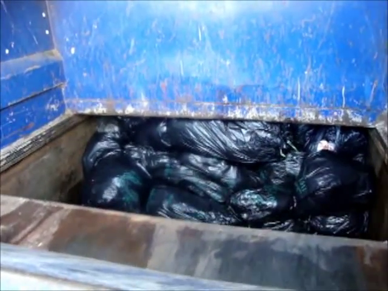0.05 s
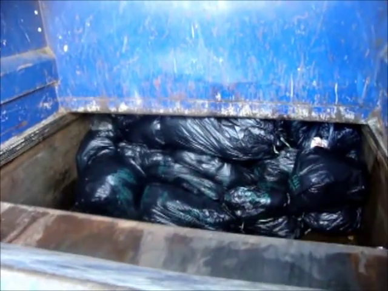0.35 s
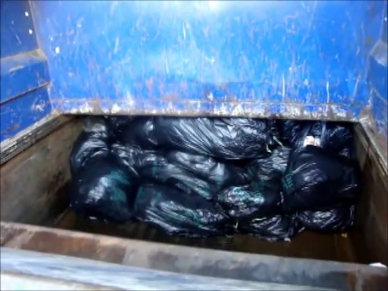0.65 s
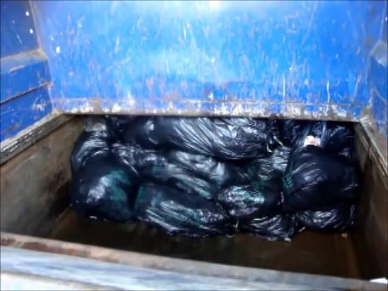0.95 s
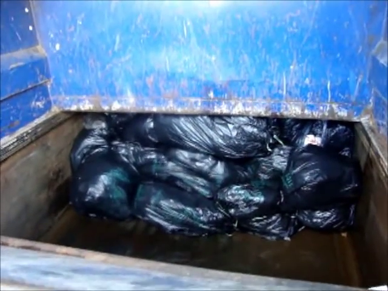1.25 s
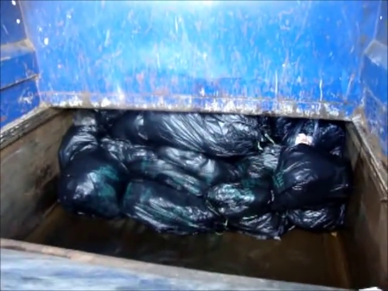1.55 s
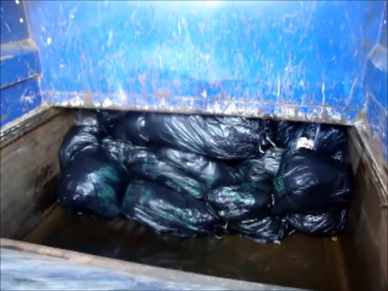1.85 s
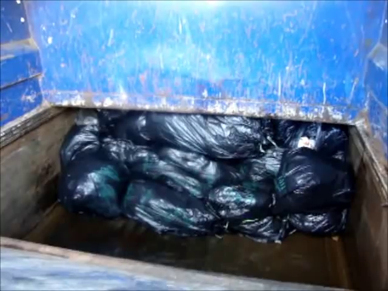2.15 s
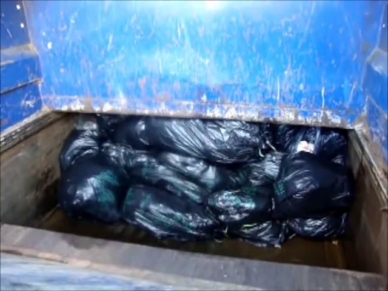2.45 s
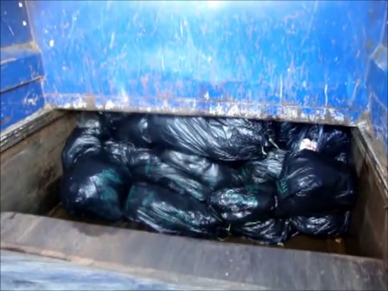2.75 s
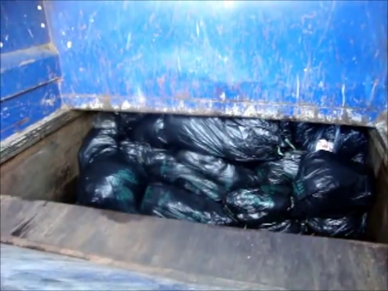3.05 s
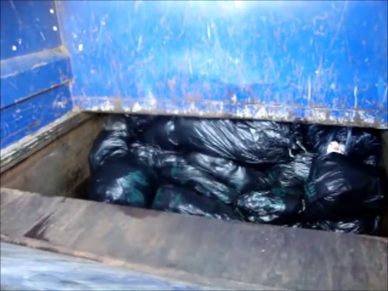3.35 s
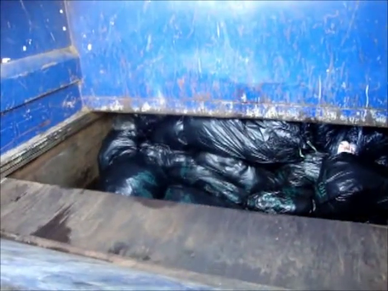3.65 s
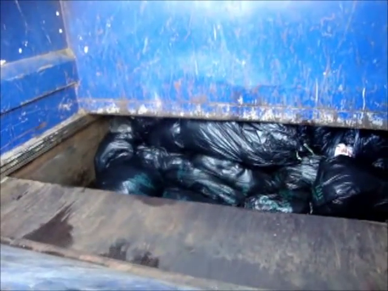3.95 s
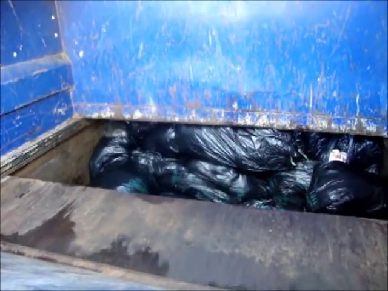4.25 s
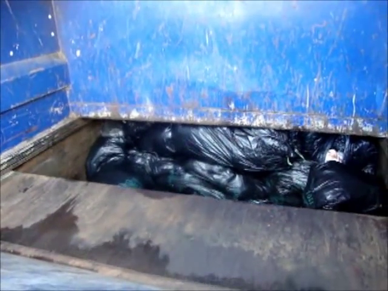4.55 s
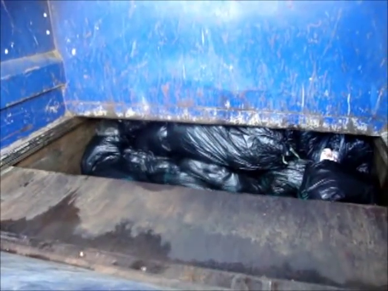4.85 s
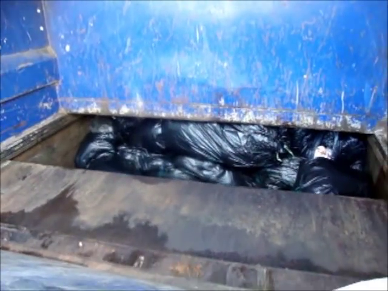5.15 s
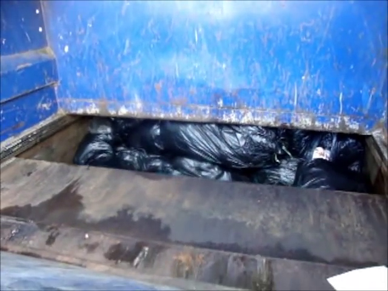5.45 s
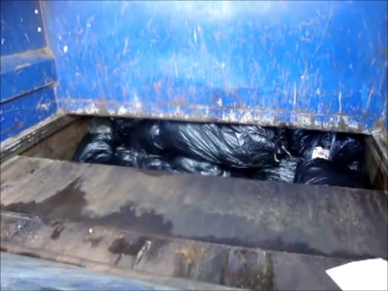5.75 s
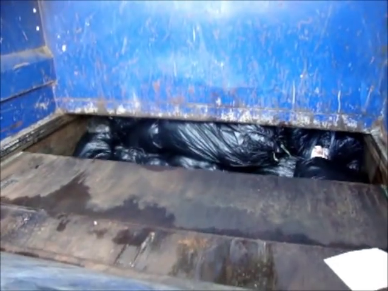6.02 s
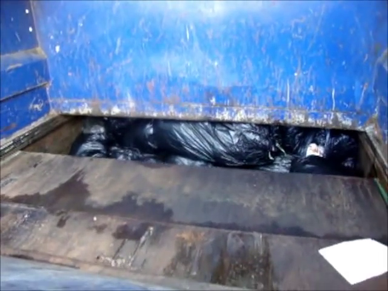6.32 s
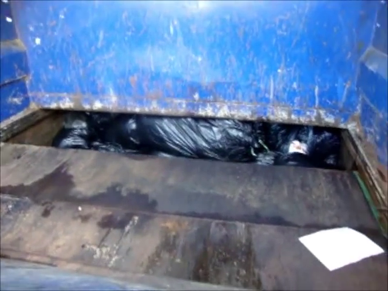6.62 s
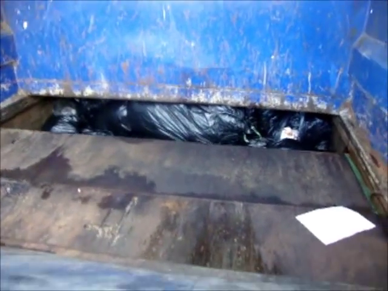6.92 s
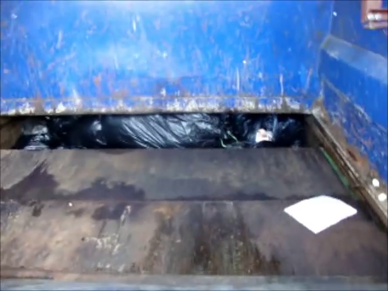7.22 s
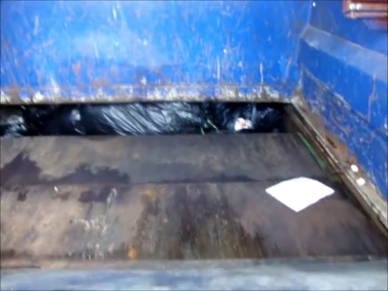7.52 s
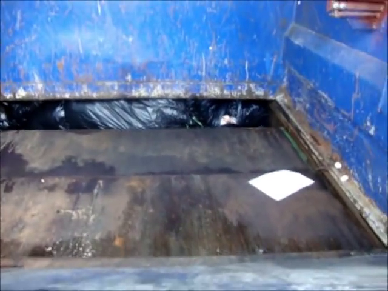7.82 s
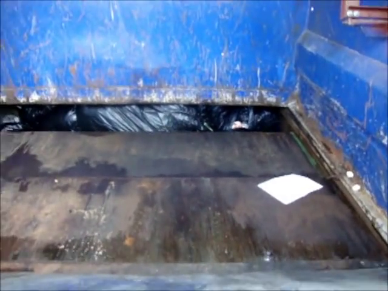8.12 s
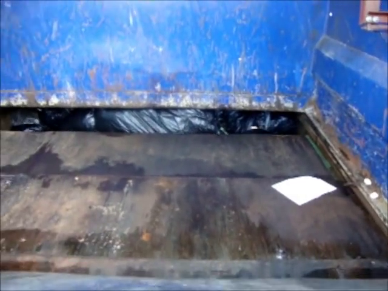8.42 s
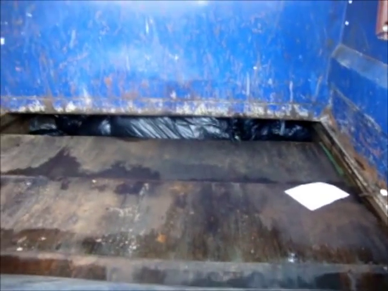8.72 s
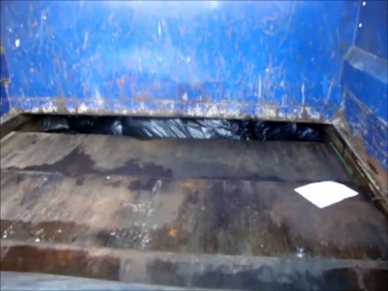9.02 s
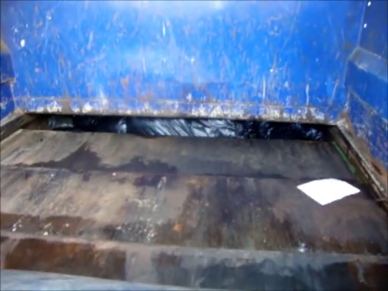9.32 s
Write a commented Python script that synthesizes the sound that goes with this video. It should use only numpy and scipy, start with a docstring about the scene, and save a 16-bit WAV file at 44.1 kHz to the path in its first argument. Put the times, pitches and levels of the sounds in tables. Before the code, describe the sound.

A trash compactor's hydraulic pump whines throughout, heard from just above the steel hopper, with a fast throb and a steady rush and hiss of oil. A metal knock comes at about 0.2 seconds, with lighter ones near 0.9 and 1.2. From about 1.2 to 1.9 seconds the whine drops slightly in pitch and strains, wavering, with a thin high hiss. A quick cluster of heavy, ringing steel clunks follows around 2 seconds, and the pitch recovers. A second loud cluster hits at about 4.4 to 4.6 seconds; the overall sound dips briefly after the heavy blows. Lighter cracks follow near 5 and 5.4 seconds. The whine then grows shriller and more rattly, its tones swelling and fading over a faint low rumble, and the throb returns around 7 seconds. A soft thump comes at 8.3 seconds and a faint, thin metal squeak at 9.

```python
"""A throbbing whine over rushing oil: a trash compactor, microphone above its steel hopper.
A motor turns a twelve-tooth hydraulic gear pump. The ram draws back, stalls the pump against
its end stop while the relief valve sings, reverses with a clunk and pushes into the bags. The steel
clunks again, the load cracks, and the whine's partials swell and fade as the cavity changes shape.
The camera's gain ducks after the heavy clunks and creeps back."""
import sys
import numpy as np
from scipy.fft import rfft, irfft, next_fast_len
from scipy.io import wavfile
from scipy.ndimage import uniform_filter1d, map_coordinates

SR = 44100
rng = np.random.default_rng(int(sys.argv[2]) if len(sys.argv) > 2 else 0)


def digitize_waveform(pressure):
    """Quantize a signal to 16-bit integers and store it at the path in sys.argv[1].

    Rows of a 2-D input are taken as channels; values are limited to [-1, 1].
    """
    field = np.atleast_2d(pressure).T
    bounded = np.clip(field, -1, 1)
    quanta = np.round(bounded * 32767).astype(np.int16)
    wavfile.write(sys.argv[1], SR, quanta)


N = 418068
TEETH = 12
TOP_HZ = 10150  # upper band limit

# faint low rumble under the whine: t/s, level/dB
LOW_RUMBLE = [(1.5, -67.5), (3.8, -48.5), (6.6, -62.5), (7.5, -52.5)]
# oil in the valves and pipes: f/Hz, relative spectral level/dB
OIL_SPECTRUM = [(50, -33), (125, -14), (170, -4.5), (250, -8), (420, 0.5), (700, 3.5), (1000, 0.5),
                (1400, -3.5), (2000, -9.5), (2700, -10), (3400, -16), (4300, -16), (6000, -21.5),
                (9800, -30.5)]
# squeak of the sliding ram: t/s, f/Hz, level/dB
RAM_SQUEAK = [(8.95, 5000, -70), (9.0, 5000, -35), (9.06, 5100, -58), (9.078, 5750, -33),
              (9.092, 5240, -43), (9.15, 5400, -37), (9.19, 5540, -70)]
# rattle of the turning shaft: f/Hz, relative spectral level/dB
RATTLE_SPECTRUM = [(50, -37), (100, -22.5), (170, 4.5), (400, 1), (800, 6), (1400, 2), (2700, -5.5),
                   (3500, -19.5), (4300, -14.5), (6000, -29), (8000, -19), (10000, -30)]
# resonances of hopper and ram: f/Hz, width/Hz, relative level/dB
STEEL_MODES = [(190, 80, -12), (380, 98, 5.5), (700, 390, 4), (905, 74, 1), (1190, 110, 3.5),
               (1480, 240, -3), (1930, 490, -7), (2440, 690, -3.5), (4070, 890, -13.5), (4450, 530, -24)]
# blows on the steel, levels relative: t/s, boom/dB, clang/dB, crack/dB, strongest mode f/Hz
STEEL_BLOWS = [(.190, -20, -11, -14.5, 1422), (.224, -28, -17.5, -28, 1405), (0.855, -39, -16, -18, 4470),
               (1.198, -34, -18, -25.5, 2880), (1.891, -15, -8.5, -18.5, 1190),
               (1.925, -21, -10.5, -16.5, 3830), (1.956, -13, -12, -36, 810),
               (1.991, -6.5, -14.5, -34, 427), (2.055, -11.5, -17, -24.5, 527),
               (2.076, -18, -15, -41, 2390), (2.104, -16, -11.5, -14.5, 1930),
               (2.145, -16, -16, -17.5, 1480), (4.397, -10.5, -8.5, -22, 1075),
               (4.423, -7, -10, -16.5, 1152), (4.529, -14, -5, -16, 945), (4.555, -12.5, -15, -28, 684),
               (4.586, -11, -30, -44, 625), (4.968, -36, -21.5, -23, 1720), (5.343, -31, -21, -27.5, 1890),
               (5.429, -35, -21, -30, 1707), (8.33, -31.5, -50, -46, 146)]
# the pump's tooth rate, sagging under full pressure: t/s, f/Hz
TOOTH_RATE = [(0, 298), (.25, 298), (1.02, 296.3), (1.27, 286.2), (1.875, 286.2), (1.93, 296.6),
              (2.4, 298.1), (9.48, 298.05)]
# groups of pump tones: f/shaft rate, relative level/dB
STRAIN_LINES = [(72, -5), (96, -7), (108, -2), (120, -12.5), (192, -27), (204, -16.5)]  # grow at full pressure
SHRILL_LINES = [(95, 5.5), (96, 2.5)]  # a pair that beats once a turn
SIDEBAND_LINES = [(9, -18.5), (11, -10), (13, -13.5), (14, -10.5), (22, -29), (25, -19), (32, -8),
                  (34, -15), (35, -3), (37, -8.5), (38, -9.5), (46, -7), (47, -7.5), (49, -9)]  # from uneven teeth, beside the tooth harmonics
OVERTONE_LINES = [(60, -4), (72, -4.5), (84, -8), (108, -12), (120, -13.5), (132, -18.5), (144, -17.5),
                  (168, -21), (204, -21), (264, -30.5), (301, -21.5), (325, -38.5)]  # high in the whine
# all sidebands together: t/s, level/dB
SIDEBAND_SWELL = [(0.0, -34.5), (2.8, -37), (2.96, -33.5), (4.92, -30.5), (5.76, -24.5), (6.76, -23.5),
                  (7.44, -23.5), (9.48, -35.5)]
# pump layers by name: level/dB pushing freely, then gain/dB drawing back, stalled, shoving, squeezing
WORK_LEVELS = {"throb": (-42, 16.5, 11.5, -15, 21.5), "shrill": (-39.5, 3, -8, 12, 1),
               "overtones": (-34, 3.5, 2, -4, 9.5), "rush": (-26.5, 3, -2, -4.5, 2.5),
               "hiss": (-31.5, 3, 2.5, 0, 3)}
# tooth harmonics 1-4 above the hopper while the ram travels: t/s, level/dB
HARMONIC_1 = [(0.0, -21.5), (0.36, -27), (2.32, -22), (3.04, -12), (4.28, -11.5), (4.84, -23), (5.6, -19.5),
              (6.162, -27), (6.36, -20.5), (6.8, -33), (6.96, -20.6), (7.56, -15), (8.04, -15.5),
              (8.44, -12), (9.48, -12.5)]
HARMONIC_2 = [(0.0, -16), (0.28, -20.5), (0.56, -15.5), (2.76, -27.5), (2.96, -19.5), (4.04, -27.5),
              (4.16, -50), (5.12, -29), (5.48, -21.2), (6.52, -16), (7.64, -27), (7.84, -32.5), (8.36, -30),
              (8.64, -15.5), (9.48, -17.8)]
HARMONIC_3 = [(0.0, -28), (0.48, -27), (0.76, -13.5), (0.96, -23), (2.52, -34), (2.839, -21), (4.72, -31),
              (4.879, -22.5), (5.08, -26.5), (7.04, -26), (7.24, -19), (7.68, -16.5), (8.0, -21.5),
              (9.48, -24)]
HARMONIC_4 = [(0.0, -27.5), (0.64, -27.5), (2.48, -21), (3.16, -22), (3.44, -31.5), (4.08, -24.5),
              (4.36, -36), (4.88, -23.5), (6.08, -16.5), (7.28, -17.5), (7.64, -27.5), (7.92, -21.5),
              (8.32, -23.5), (8.6, -41), (8.96, -22), (9.48, -23)]
# the same four at stall: starting level/dB, slope/(dB/s) as the pressure holds
STALL_HARMONICS = [(-34.5, 13.5), (-25.5, 5), (-7, -5), (-21, 3)]


def amp(db):
    return 10 ** (np.asarray(db) / 20)


def unit_rms(x):
    return x / np.sqrt(np.mean(x ** 2) + 1e-20)


def spectrum_db(points, hz):
    """Levels between (f/Hz, level/dB) points on a log frequency axis."""
    point_hz, db = np.transpose(points)
    return np.interp(np.log(hz + 1), np.log(point_hz + 1), db)


def curves(rows):
    """One value per sample for each column after the time."""
    times, *columns = np.transpose(rows)
    return [np.interp(np.arange(N) / SR, times, column) for column in columns]


def wobble(rate):
    """A smooth random curve, rate knots a second."""
    at = np.linspace(0, N * rate / SR, 2048)
    coarse = map_coordinates(rng.standard_normal(512), [at], mode="wrap")
    return np.interp(np.linspace(0, at[-1], N), at, coarse)


def filtered(x, response):
    """x shaped by a gain that depends on frequency."""
    size = next_fast_len(len(x) + SR // 4)
    return irfft(rfft(x, size) * response(np.fft.rfftfreq(size, 1 / SR)), size)[:len(x)]


def noise(response, size=N):
    """Coloured noise at unit RMS."""
    return unit_rms(filtered(rng.standard_normal(size), response))


def lowpass(hz, edge_hz, order=6):
    return 1 / np.sqrt(1 + (hz / edge_hz) ** (2 * order))


def highpass(hz, edge_hz, order=6):
    return (hz / edge_hz) ** order * lowpass(hz, edge_hz, order)


def shaft_tones(turns, phases, lines, waver_db=0, drift=0, flutter_db=0):
    """Sines locked to the shaft; those round one tooth harmonic share its path and swell together."""
    total = np.zeros(N)
    for order, db in lines:
        harmonic = round(order / TEETH)
        lag = .45 * (phases[harmonic] - .5)
        cycles = order * turns + phases[harmonic] + (order - harmonic * TEETH) * lag
        angle = 2 * np.pi * cycles + drift * wobble(1.465)
        flutter = flutter_db * np.cos(2 * np.pi * (turns + 2 * lag))
        total += amp(db + flutter + waver_db * wobble(1.89)) * np.cos(angle)
    return unit_rms(total)


def ram_effort(tooth_hz, onset_hz=296.5, drop_hz=6, shove_s=(4.9, 7), squeeze_s=(6.6, 7.66)):
    """Shares 0-1: the ram draws back until the pump stalls, then shoves the bags and squeezes them."""
    stall = np.clip((onset_hz - tooth_hz) / drop_hz, 0, 1)
    back = 1 - np.maximum.accumulate(stall)
    shove, squeeze = (np.interp(np.arange(N) / SR, span, [0, 1]) for span in (shove_s, squeeze_s))
    return back, stall, shove, squeeze


def low_rumble():
    """A faint low rumble swells and fades under the whine."""
    db, = curves(LOW_RUMBLE)
    return amp(db + 1.7 * wobble(2.9)) * noise(lambda hz: lowpass(hz, 100, order=2))


def ram_squeak():
    """Steel slides on steel in a faint, thin, unsteady tone."""
    hz, db = curves(RAM_SQUEAK)
    return amp(db) * np.sqrt(2) * np.sin(2 * np.pi * np.cumsum(hz + 60 * wobble(83)) / SR)


def oil_flow(turns, rush_db, hiss_db, split_hz=1400):
    """Oil rushes through the pipes; its hiss spurts with each tooth and in lumps as the shaft turns."""
    colour = lambda hz: amp(spectrum_db(OIL_SPECTRUM, hz))
    rush = noise(lambda hz: colour(hz) * lowpass(hz, split_hz))
    shaft = 2 * np.pi * turns
    spurts = amp(1.5 * np.cos(TEETH * shaft) + np.cos(2 * shaft) + np.cos(3 * shaft))
    hiss = filtered(spurts * rng.standard_normal(N), lambda hz: colour(hz) * highpass(hz, split_hz))
    return amp(rush_db + .15 * wobble(14)) * rush + amp(hiss_db + wobble(8.3)) * unit_rms(hiss)


def relief_valve(turns, phases, jet_hz=6750, half_width_hz=450, jet_db=-43, strain_db=-32):
    """At full pressure oil jets through the relief valve and the teeth bite harder."""
    jet = noise(lambda hz: 1 / (1 + ((hz - jet_hz) / half_width_hz) ** 2))
    bite = amp(3 * wobble(16)) * shaft_tones(turns, phases, STRAIN_LINES, waver_db=1.5, drift=.5)
    return amp(jet_db) * jet + amp(strain_db) * bite


def shaft_rattle(turns, focus_db=17, count=14, size=4096):
    """One turn's pattern of knocks repeats and slowly changes, strongest round the tooth harmonics."""
    order = np.arange(size // 2 + 1)
    hz = order * TOOTH_RATE[-1][1] / TEETH
    comb_db = focus_db * np.cos(np.pi * order / TEETH) ** 8
    colour = amp(spectrum_db(RATTLE_SPECTRUM, hz) + comb_db) * (hz < TOP_HZ) * (order > 0)
    spectra = rng.standard_normal((count, len(order), 2)) @ [1, 1j]
    patterns = irfft(colour * spectra, size)
    position = [np.linspace(0, count - 1, N), turns % 1 * size]  # which pattern, where in the turn
    return unit_rms(map_coordinates(patterns, position, order=1, mode="grid-wrap"))


def steel_clunks(boom_hz=700, crack_hz=2200, t60=.23, boom_t60=.3, attack_s=.002, sheet_db=-26):
    """Blows ring the crowded modes of the plates below the microphone; the low ones hang on longest."""
    def colour(hz):
        power = sum(amp(2 * db) / (1 + (2 * (hz - mode_hz) / width) ** 2)
                    for mode_hz, width, db in STEEL_MODES)
        return np.sqrt(power + amp(2 * sheet_db)) * highpass(hz, 170, 4) * lowpass(hz, 5700, 2)

    t = np.arange(SR) / SR
    bands = [lambda hz: lowpass(hz, boom_hz),
             lambda hz: highpass(hz, boom_hz) * lowpass(hz, crack_hz),
             lambda hz: highpass(hz, crack_hz)]
    out = np.zeros(N + SR)
    for start_s, *levels, ring_hz in STEEL_BLOWS:
        ring_db = levels[np.searchsorted([boom_hz, crack_hz], ring_hz)] + 1.5  # one mode stands out
        chatter = 1 + .23 * rng.standard_normal(SR)  # loose plates roughen the ring
        blow = amp(ring_db - 60 * t / t60) * np.sin(2 * np.pi * ring_hz * np.cumsum(chatter) / SR)
        for band, db, decay_s in zip(bands, levels, (boom_t60, t60, t60)):
            blow += amp(db + 3 - 60 * t / decay_s) * noise(lambda hz: colour(hz) * band(hz), SR)
        out[round(start_s * SR):][:SR] += (1 - np.exp(-t / attack_s)) * blow
    return out[:N]


def gear_teeth(turns, phases, db, sideband_db, throb_order=23, tick_order=168, tick_db=-49.5):
    """Uneven teeth add tones that beat with the whine; one high tone ticks once a turn."""
    throb = shaft_tones(turns, phases, [(throb_order, 0)])
    shrill = shaft_tones(turns, phases, SHRILL_LINES, waver_db=1, drift=.2)
    sidebands = shaft_tones(turns, phases, SIDEBAND_LINES, waver_db=1.8, drift=.7)
    overtones = shaft_tones(turns, phases, OVERTONE_LINES, waver_db=2, drift=.4, flutter_db=4.3)
    tick = shaft_tones(turns, phases, [(tick_order, 0)], waver_db=1, drift=.2, flutter_db=10)
    return (amp(db["throb"]) * throb + amp(db["shrill"]) * shrill + amp(sideband_db) * sidebands
            + amp(db["overtones"]) * overtones + amp(tick_db) * tick)


def pump_whine(turns, phases, stall, tooth_hz, beat_hz=4.65, panel_hz=1169, panel_db=8.5):
    """Four tooth harmonics in the foreground; at stall the relief valve sings just above the third."""
    beat = np.exp(2j * np.pi * beat_hz * (np.arange(N) / SR - 1.27))
    valve_share = .61 * stall
    valve_beat = (1 - valve_share + valve_share * beat) / np.hypot(1 - valve_share, valve_share)
    held_s = np.cumsum(stall) / SR
    harmonics = (HARMONIC_1, HARMONIC_2, HARMONIC_3, HARMONIC_4)
    total = np.zeros(N)
    for k, (levels, (start_db, db_per_s)) in enumerate(zip(harmonics, STALL_HARMONICS), 1):
        travel_db, = curves(levels)
        stall_db = start_db + db_per_s * held_s
        # the slowing fourth harmonic slides through a narrow resonance of the steel
        resonance_db = panel_db * np.exp(-((k * tooth_hz - panel_hz) / 5.5) ** 2)
        db = travel_db + stall * (stall_db - travel_db) + resonance_db
        tone = np.exp(2j * np.pi * (k * TEETH * turns + phases[k]))
        if k == 3:
            tone *= valve_beat
        else:
            tone *= amp((3.3 if k < 3 else 1.5) * stall * wobble(21.9))  # the straining pump judders
        total += amp(db + .22 * k * wobble(11)) * np.sqrt(2) * tone.real
    return total


def scene():
    """The mix above the hopper: the shaft's angle times the pump, the ram's effort shifts its levels."""
    tooth_hz, = curves(TOOTH_RATE)
    turns = np.cumsum(tooth_hz + .103 * wobble(7)) / TEETH / SR
    phases = rng.random(size=32)  # each tooth harmonic takes its own path through the steel
    back, stall, shove, squeeze = ram_effort(tooth_hz)
    db = {name: free + np.dot(added, [back, stall, shove, squeeze])
          for name, (free, *added) in WORK_LEVELS.items()}
    sideband_db, = curves(SIDEBAND_SWELL)
    rattle_db = (sideband_db + db["overtones"]) / 2 + 6 - 2.8 * stall  # pressure takes up the play
    pump = pump_whine(turns, phases, stall, tooth_hz) + gear_teeth(turns, phases, db, sideband_db)
    pump += amp(rattle_db) * shaft_rattle(turns)
    pump += stall * relief_valve(turns, phases)
    steel = steel_clunks()
    oil = oil_flow(turns, db["rush"], db["hiss"])
    return (pump + steel + oil + ram_squeak() + low_rumble())[None]


def gain_control(x, ceiling_db=-7.5, recovery_db_per_s=10, window_s=.0073):
    """The microphone's gain drops at once when the sound passes the ceiling, then creeps back."""
    size = int(window_s * SR)
    level_db = 10 * np.log10(np.abs(uniform_filter1d(x ** 2, size)) + 1e-12)
    over_db = np.maximum(level_db - ceiling_db, 0)
    regained_db = recovery_db_per_s * np.arange(N) / SR
    cut_db = np.maximum.accumulate(over_db + regained_db) - regained_db
    return x * amp(-uniform_filter1d(cut_db, size))


def record(dry):
    """The camera ducks after loud blows, rounds off peaks, thins the deepest bass and cuts the top."""
    ducked = gain_control(dry[0])
    rounded = ducked / (1 + np.abs(ducked) ** 10) ** (1 / 10)
    return filtered(rounded, lambda hz: highpass(hz, 30, order=1) * lowpass(hz, TOP_HZ, order=90))[None]


dry = scene()
out = record(dry)
digitize_waveform(out)
```